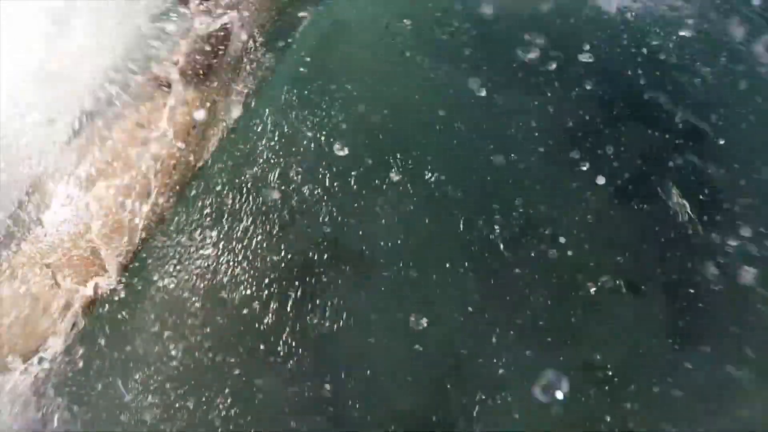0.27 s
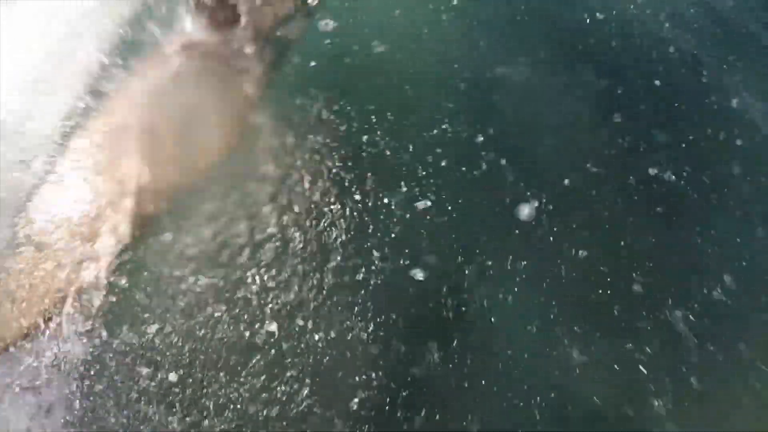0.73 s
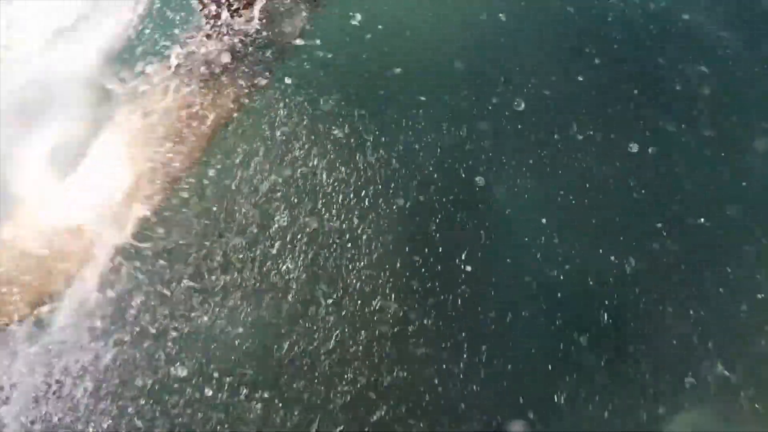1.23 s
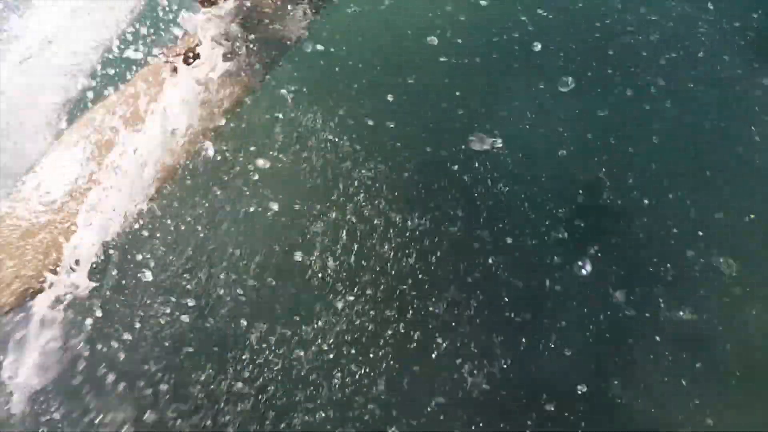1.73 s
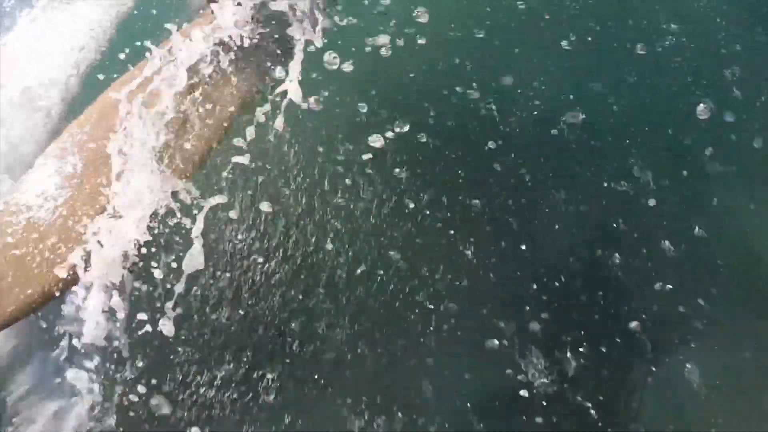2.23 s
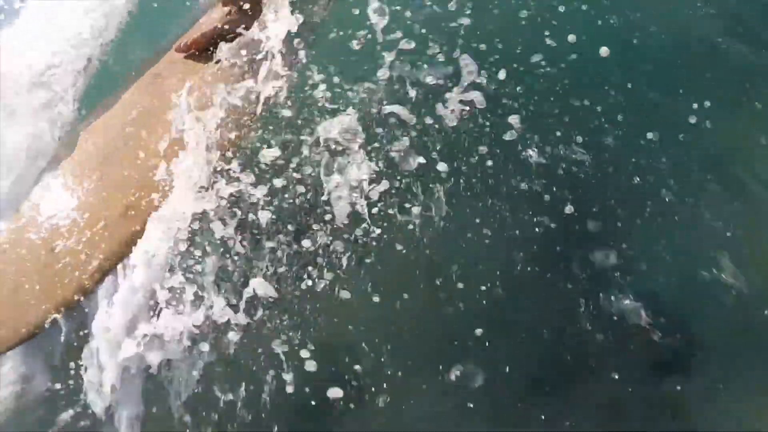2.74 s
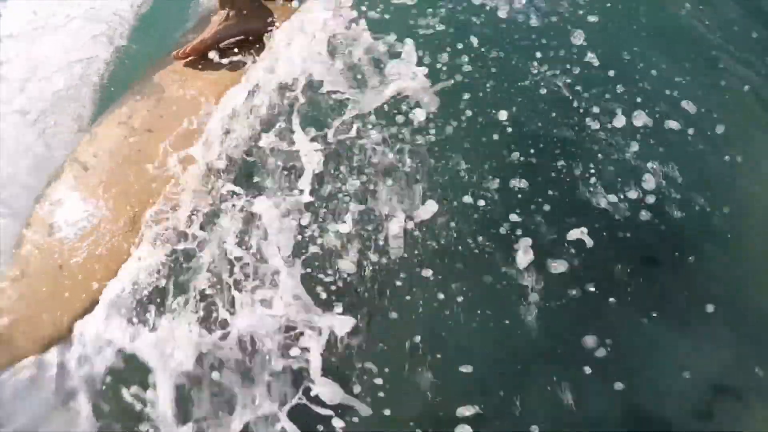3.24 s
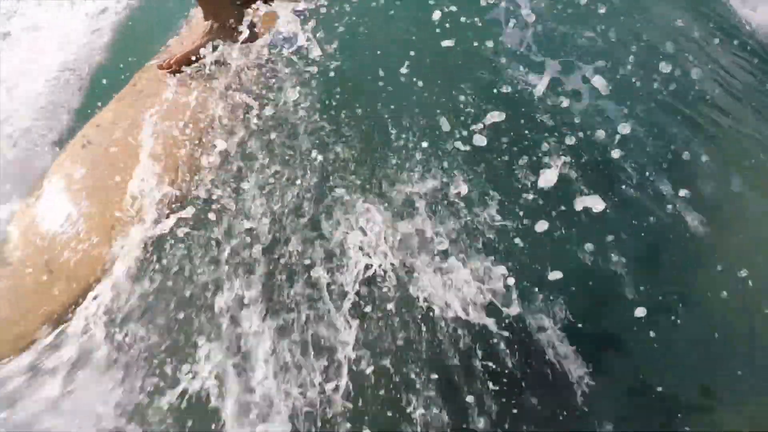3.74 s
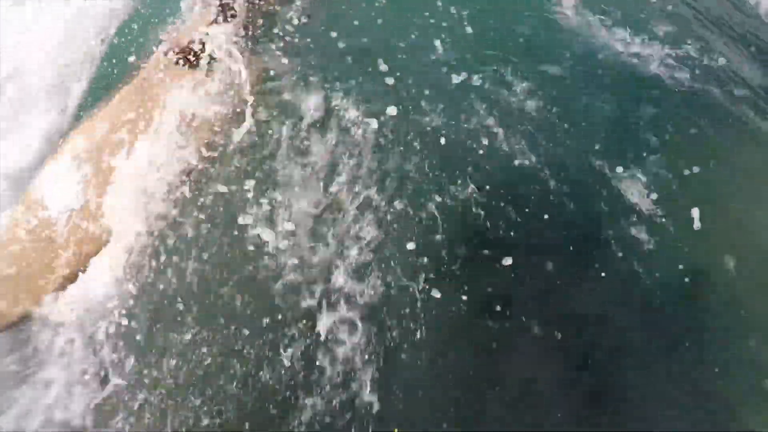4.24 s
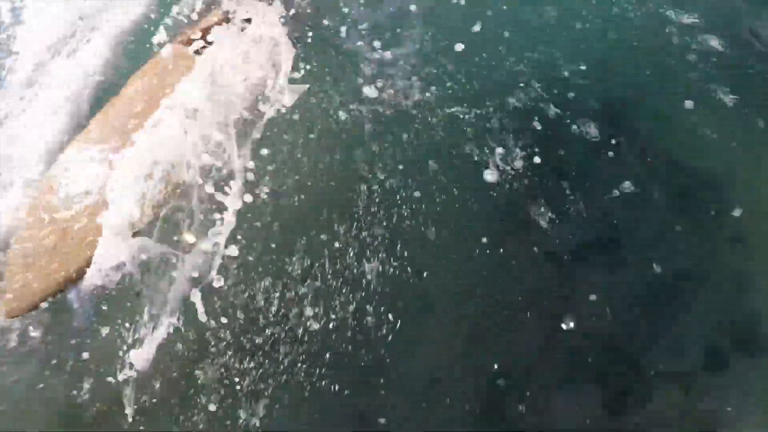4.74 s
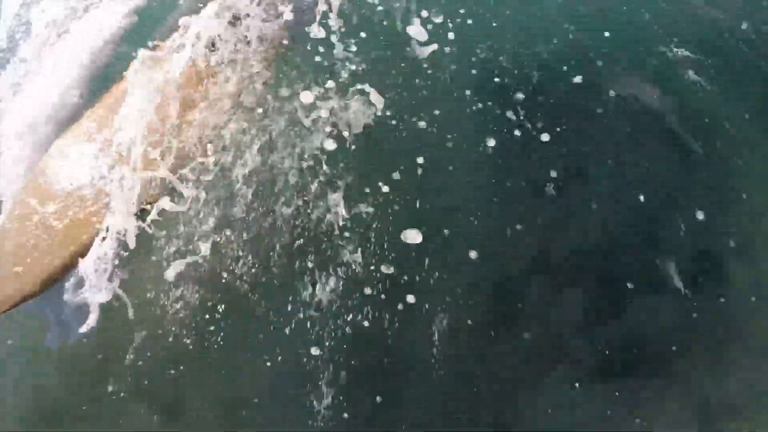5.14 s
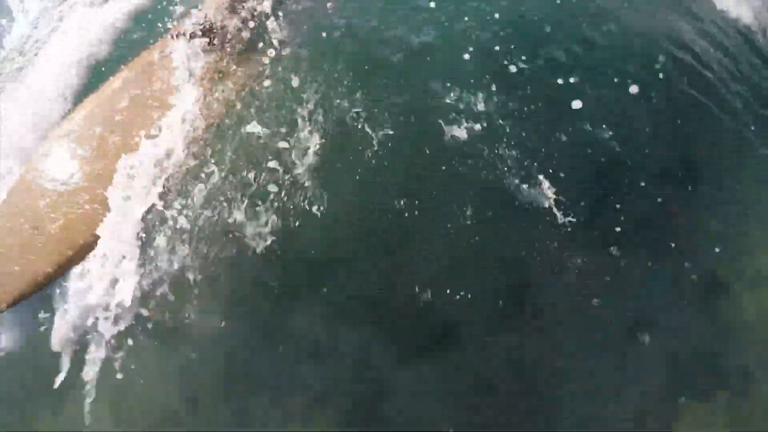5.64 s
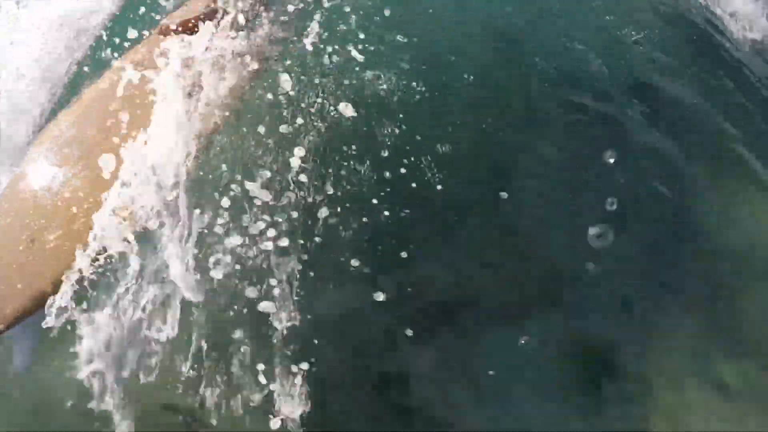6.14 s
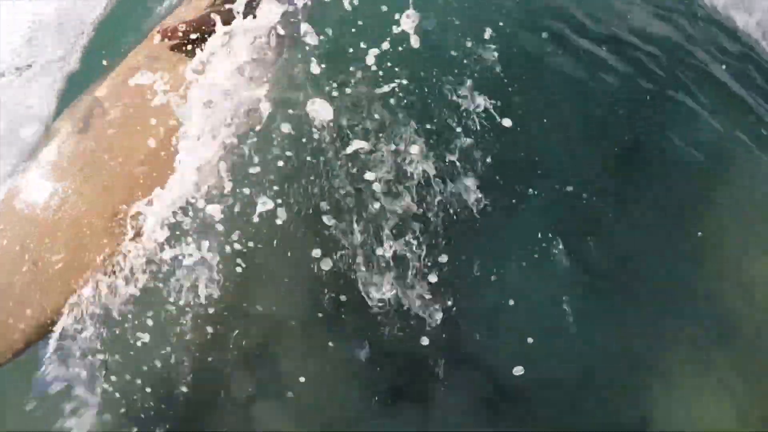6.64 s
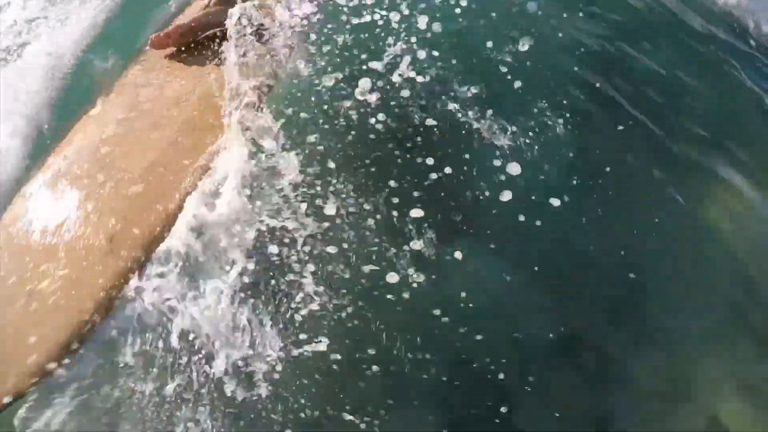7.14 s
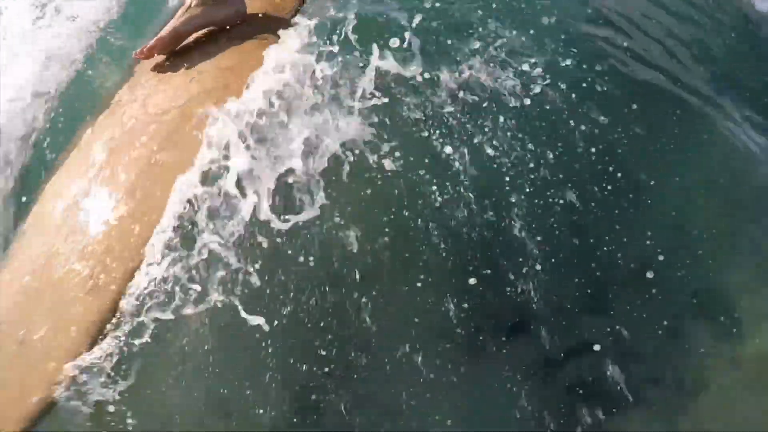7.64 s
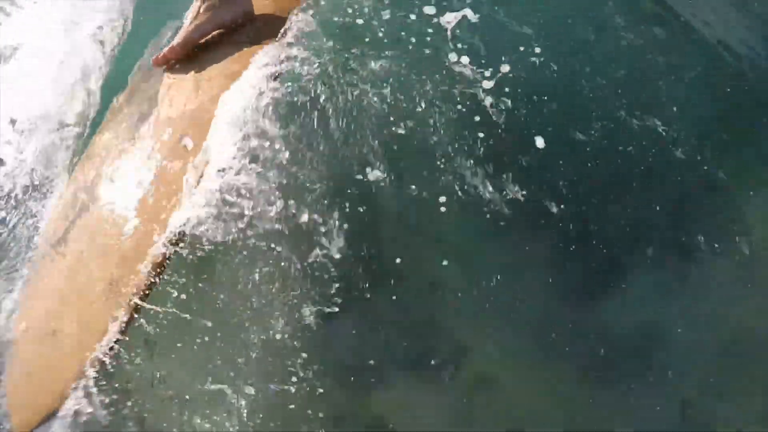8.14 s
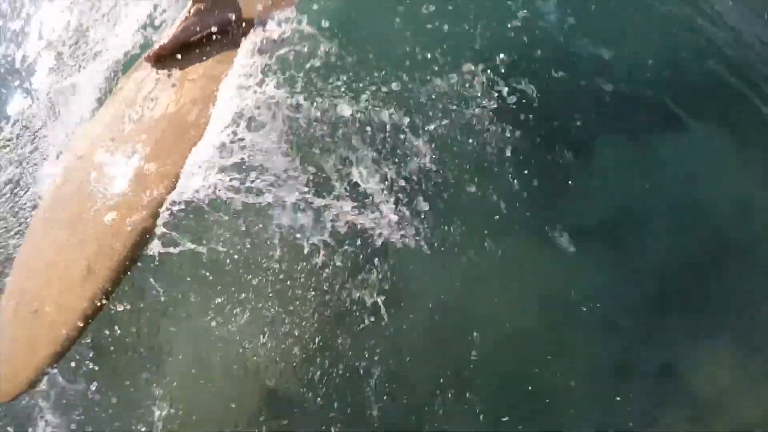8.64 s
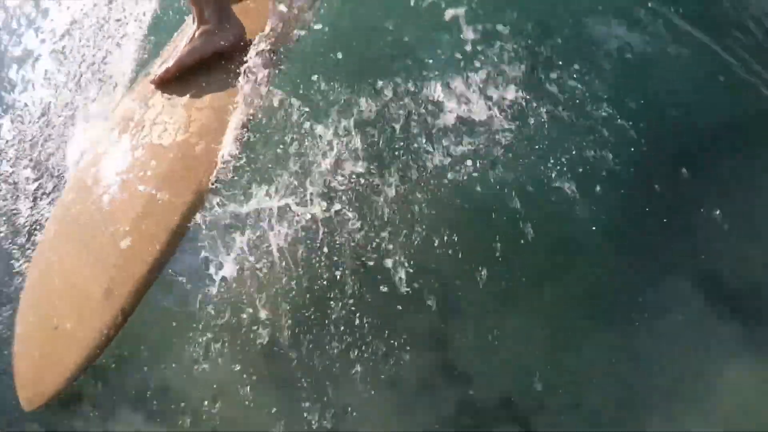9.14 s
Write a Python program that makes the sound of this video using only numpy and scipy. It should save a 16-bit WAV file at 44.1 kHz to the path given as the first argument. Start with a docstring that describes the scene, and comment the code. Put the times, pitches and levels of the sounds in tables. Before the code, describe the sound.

Dull, slowed-down rush of water under a surfboard riding a wave, with fizzing spray, low gulps and wind thumping on the microphone.

```python
"""Surfboard in slow motion

A surfboard runs along a wave, heard from a waterproof camera case close above the water.
The rail throws a rush of bubbles and spray; water churns under the board and surges over bumps,
growing louder and brighter as the board gathers speed. Air pockets gulp below, wind rumbles and
buffets the case, and a few drops tick on it. The case muffles the rush and the droplets."""
import sys
import numpy as np
from scipy import signal
from scipy.fft import rfft, irfft, next_fast_len
from scipy.io import wavfile
from scipy.ndimage import uniform_filter1d

SR = 44100
rng = np.random.default_rng(int(sys.argv[2]) if len(sys.argv) > 2 else 0)


def persist_wave(psi):
    """Save psi, clipped to +-1, as 16-bit WAV."""
    counts = np.round(np.clip(psi, -1, 1) * 32767).astype(np.int16)
    wavfile.write(sys.argv[1], SR, np.atleast_2d(counts).T)


N = 414089
TIME = np.arange(N) / SR

# what the case walls let through, falling in steps above each resonance: freq_hz, gain_db
CASE_RESPONSE = [(300, -0.5), (635, -0.5), (695, -8), (745, -8), (1050, -7.5), (1130, -8.5), (1205, -14.5),
                 (1320, -9.5), (1430, -16), (1800, -9), (1950, -19.5), (2190, -14), (2340, -17.5),
                 (4000, -16.5)]
# thrown sheets of water landing beside the board: centre_s, half_length_s, cloud_db, spray_rise_db
SPLASHES = [(0.697, 0.24, -53, 4), (3.44, 0.25, -41.5, 7), (7.05, .19, -46.5, 0.5)]


def rush(rush_db, gain_db=1.9, flutter_db=0.77):
    """The rail pushes a deep wash aside and peels off a thin sheet that tears into dense bubbles."""
    # tone of the deep wash: freq_hz, gain_db
    wash_colour = [(100, -16), (280, 0), (450, -0.5), (630, -2.5), (800, -8.5), (1200, -18.5), (2000, -31),
                   (3200, -51)]
    # tone of the thin sheet, which sounds higher: freq_hz, gain_db
    sheet_colour = [(150, -23.5), (330, -4.5), (500, -1), (630, 0.5), (1000, 0.5), (1300, -6),
                    (2000, -23.5), (3200, -49.5)]
    # balance of the sheet against the wash: time_s, balance_db
    sheet_balance = [(0, -2), (1.8, -2.5), (2.4, 4.5), (3.4, 4), (3.9, 0.5), (6.1, -2.5), (7.1, -1.5),
                     (8.2, -4), (9.39, -3.5)]
    sheet_db, = curves(sheet_balance)
    foam = bubbles(low_hz=423, high_hz=1200, cycles=20, spread_db=2.5, count=3000)
    sheet = unit(colour(rng.standard_normal(N) + undb(-17.5) * foam, sheet_colour))
    wash = unit(colour(rng.standard_normal(N), wash_colour))
    flow = (wash + undb(sheet_db) * sheet) * undb(flutter_db * walk(rate_hz=70))
    return even(colour(flow, CASE_RESPONSE), span_s=0.25) * undb(rush_db + gain_db)


def churn(rush_db, lumpy_db=1.4):
    """Lumpy turbulence and large bubbles drum under the board, harder over each bump."""
    # low body of the churn: freq_hz, gain_db
    churn_colour = [(50, -16.5), (90, 0.5), (150, -2), (215, -1.5), (250, -4), (300, -13), (500, -37)]
    # how the churn follows the ride: base_db, db_per_speed_doubling, db_per_rush_db
    churn_law = (-30, 7.2, 0.25)
    # bumps in the wave that make the water surge: centre_s, half_length_s, rise_db
    surges = [(2.1, 0.6, 4), (3.0, 0.23, 5), (6.1, 0.51, 3.5), (7.81, 0.12, 7.5), (8.138, .09, 6.5)]
    surge_db = sum(rise_db * swell(s, half_s) for s, half_s, rise_db in surges)
    level_db = follow_ride(churn_law, rush_db) + surge_db
    pockets = bubbles(low_hz=88, high_hz=270, cycles=11, spread_db=2.5, count=500)
    turbulence = rng.standard_normal(N) * undb(lumpy_db * walk(rate_hz=18))
    flow = turbulence + undb(-22) * pockets
    return even(colour(flow, churn_colour), span_s=0.15) * undb(level_db)


def spray(rush_db, patter_db=0.68, mist_share=0.5):
    """Thrown droplets fall back in flurries and fizz on the water; the finest of them hiss above."""
    # tone of the falling droplets: freq_hz, gain_db
    droplet_colour = [(500, -20.5), (900, -6), (1300, 2.5), (1800, -1.5), (2300, -5), (2700, -18),
                      (3400, -41)]
    # hiss of the fine mist: freq_hz, gain_db
    mist_colour = [(1000, -17), (2000, -7), (2450, 0.5), (2750, -5), (3000, -9), (3500, -17.5),
                   (4000, -39.5)]
    # how droplets and mist follow the ride: base_db, db_per_speed_doubling, db_per_rush_db
    droplet_law = (-49, 5, .55)
    mist_law = (-62, 13, 0.36)
    thrown_db = sum(rise_db * swell(s, half_s) for s, half_s, _, rise_db in SPLASHES)
    droplets_db = follow_ride(droplet_law, rush_db) + thrown_db
    mist_db = follow_ride(mist_law, rush_db) + mist_share * thrown_db
    fizz = bubbles(low_hz=960, high_hz=2440, cycles=9.6, spread_db=3.0, count=5000)
    patter = colour(rng.standard_normal(N) + undb(-13.5) * fizz, droplet_colour)
    droplets = unit(colour(patter, CASE_RESPONSE))
    mist = unit(colour(rng.standard_normal(N), mist_colour))
    flurries = undb(patter_db * walk(rate_hz=45))
    return flurries * (droplets * undb(droplets_db) + mist * undb(mist_db))


def splash():
    """Each landing sheet drives a cloud of like-sized bubbles under, which swells and clears."""
    # narrow band of the bubble cloud: freq_hz, gain_db
    cloud_colour = [(600, -19), (850, -2.5), (1000, 2), (1130, -8), (1400, -22)]
    cloud = unit(colour(rng.standard_normal(N), cloud_colour))
    return cloud * sum(undb(cloud_db) * swell(s, half_s) for s, half_s, cloud_db, _ in SPLASHES)


def gulps(attack_s=0.0068, gain_db=1.5):
    """A trapped pocket of air swells into a low note that rises as it nears the surface."""
    # air pockets closing under the board: start_s, pitch_hz, relative_db, t60_s
    pockets = [(2.128, 168, -16, .07), (4.589, 186.5, -13, 0.076), (7.759, 215, -9, 0.2),
               (7.892, 188, -12, 0.067), (8.084, 227, -19, 0.098), (8.92, 206, -14.5, 0.13)]
    out = np.zeros(N)
    for start_s, pitch_hz, relative_db, t60_s in pockets:
        note = ring(pitch_hz, t60_s, glide=0.45)
        attack = 1 - np.exp(-np.arange(len(note)) / SR / attack_s)
        add(out, start_s, undb(relative_db + gain_db) * note * attack)
    return out


def wind(rumble_gain_db=1.23):
    """Small eddies rumble on the case all the time; big ones come as single buffets."""
    # wind strength, gusty at first and then steady: time_s, relative_db
    gusts = [(0, -26), (0.6, -21), (0.9, -29.5), (1.2, -29.5), (1.55, -21.5), (2.25, -31), (3.2, -21.5),
             (3.5, -24.5), (4.4, -26), (5.2, -22.5), (7.15, -21.5), (7.4, -24), (9.39, -23.5)]
    # tone of the rumble: freq_hz, gain_db
    rumble_colour = [(4, -3.5), (12, 3), (30, 1), (45, -5), (56, -3), (70, -10), (110, -20.5), (200, -39.5),
                     (500, -68)]
    # big eddies that hit the case: centre_s, pitch_hz, peak_db, half_length_s
    buffets = [(0.126, 26, -10, 0.021), (0.466, 45, -18, 0.062), (1.539, 25, -7, 0.04),
               (3.172, 45, -2.5, 0.014), (3.271, 66, -18, 0.031), (5.019, 46, -7, 0.013),
               (5.942, 44, -9.5, 0.022), (6.342, 42, -8.5, 0.014), (7.057, 28, -14, 0.061),
               (7.682, 80, -13.5, 0.026), (7.827, 88, -13, 0.025), (8.121, 112, -20, 0.031),
               (9.092, 48, -1.5, 0.012), (9.132, 46, -3.5, .016), (9.265, 34, -10.5, 0.011)]
    gust_db, = curves(gusts)
    rumble = even(colour(rng.standard_normal(N), rumble_colour), span_s=0.22)
    out = rumble * undb(gust_db + rumble_gain_db)
    for centre_s, pitch_hz, peak_db, half_s in buffets:
        t = np.arange(-3 * half_s, 3 * half_s, 1 / SR)
        thump = np.cos(2 * np.pi * pitch_hz * t) * np.exp(-(t / half_s) ** 2)
        add(out, centre_s + t[0], undb(peak_db) * thump)
    return out


def drops(t60_s=0.013, overtone_ratio=1.5, overtone_db=-11, attack_s=0.00044, gain_db=4):
    """Each drop knocks two short rings out of the case; its soft contact rounds the attack."""
    # drops striking the case: start_s, pitch_hz, relative_db
    hits = [(0.228, 750, -26), (0.645, 900, -27), (3.503, 980, -24.5), (3.677, 640, -20),
            (5.701, 1210, -22.5), (6.554, 1120, -27), (7.112, 966, -30), (7.510, 1330, -28),
            (7.558, 1260, -33), (7.751, 682, -25)]
    out = np.zeros(N)
    for start_s, pitch_hz, relative_db in hits:
        overtone = undb(overtone_db) * ring(pitch_hz * overtone_ratio, t60_s, glide=0.05)
        knock = ring(pitch_hz, t60_s, glide=0.05) + overtone
        attack = (1 - np.exp(-np.arange(len(knock)) / SR / attack_s)) ** 2
        add(out, start_s, undb(relative_db + gain_db) * knock * attack)
    return out


def follow_ride(law, rush_db, usual_rush_db=-34):
    """Level in dB of a water sound that grows with the board's speed and the bite of the rail."""
    # the board gathers speed: time_s, share_of_full_speed
    board_speed = [(0, 0.45), (1.9, 0.47), (3.3, .74), (4.6, 0.78), (5.4, 0.89), (6.6, 0.99), (9.39, 0.98)]
    speed, = curves(board_speed)
    base_db, db_per_speed_doubling, db_per_rush_db = law
    return base_db + db_per_speed_doubling * np.log2(speed) + db_per_rush_db * (rush_db - usual_rush_db)


def bubbles(low_hz, high_hz, cycles, spread_db, count):
    """A swarm of bubbles of many sizes, each ringing briefly and rising in pitch."""
    out = np.zeros(N)
    for when, pitch, strength in rng.random((count, 3)):
        hz = low_hz + (high_hz - low_hz) * pitch
        rarity = -np.log(1 - 0.99 * strength)  # many quiet bubbles, a few loud ones
        gain = undb(spread_db * rarity) * np.sqrt(hz)
        add(out, when * N / SR, gain * ring(hz, cycles / hz, glide=0.22))
    return unit(out)


def ring(hz, t60_s, glide):
    """A dying sine whose pitch rises by the share glide as it fades by 60 dB."""
    t = np.arange(int(t60_s * SR) + 2) / SR
    return np.sin(2 * np.pi * hz * t * (1 + glide * t / t60_s / 2)) * np.exp(-np.log(1000) * t / t60_s)


def colour(x, points):
    """Causal EQ through (freq_hz, gain_db) points, falling 20 dB an octave above the last."""
    size = next_fast_len(N + SR // 2, real=True)
    size += size % 2
    hz, db = np.transpose(points)
    octave = np.log2(np.maximum(np.arange(size // 2 + 1) * SR / size, 1))
    gain_db = np.interp(octave, np.log2(hz), db) - 20 * np.maximum(octave - np.log2(hz[-1]), 0)
    # folding the cepstrum gives minimum phase: nothing rings ahead of an attack
    cepstrum = irfft(np.log(undb(gain_db)), size)
    cepstrum[1:size // 2] *= 2
    cepstrum[size // 2 + 1:] = 0
    return irfft(rfft(x, size) * np.exp(rfft(cepstrum)), size)[:N]


def walk(rate_hz):
    """A wobble of rms 1 that slides to a new random value rate_hz times a second."""
    hold = int(SR / rate_hz)
    steps = np.repeat(rng.standard_normal(N // hold + 1), hold)
    return unit(uniform_filter1d(steps, hold)[:N])


def even(x, span_s):
    """Hold turbulence steady: rms near 1 over every stretch of span_s."""
    width = int(span_s * SR)
    power = uniform_filter1d(uniform_filter1d(x ** 2, width), width)
    return x / np.sqrt(power + 1e-12)


def swell(centre_s, half_s):
    """A smooth rise and fall around centre_s."""
    return np.exp(-((TIME - centre_s) / half_s) ** 2)


def curves(table):
    """The columns of a breakpoint table as envelopes, sample by sample."""
    time_s, *columns = np.transpose(table)
    return [np.interp(TIME, time_s, column) for column in columns]


def add(out, start_s, sound):
    """Mix a sound in at start_s."""
    start = int(np.clip(start_s * SR, 0, N))
    out[start:start + len(sound)] += sound[:N - start]


def undb(db):
    """Decibels to gain."""
    return 10 ** (np.asarray(db) / 20)


def unit(x):
    """Scale to rms 1."""
    return x / np.sqrt(np.mean(x ** 2))


def scene():
    """Wind and water at the one microphone."""
    # water pushed aside as the rail bites and lets go: time_s, relative_db
    rail_bite = [(0.02, -38), (0.67, -40), (2.57, -37.5), (2.6, -38.5), (3.95, -33.5), (4.76, -36),
                 (5.36, -33.5), (6.03, -35.5), (6.53, -33.5), (7.08, -34), (7.1, -31), (7.28, -34.5),
                 (7.91, -32.5), (7.93, -35), (8.82, -34), (8.9, -34.5), (8.95, -31), (9.37, -35)]
    rush_db, = curves(rail_bite)
    return (wind() + churn(rush_db) + rush(rush_db) + spray(rush_db) + splash() + drops() + gulps())[None]


def record(dry, dull_hz=3500, slow_rate_hz=12000, top_hz=15000):
    """Slow motion spreads the samples out and joins them by straight lines, leaving a faint sizzle."""
    dull = signal.sosfilt(signal.butter(12, dull_hz, fs=SR, output="sos"), dry[0])
    sparse = signal.resample_poly(dull, slow_rate_hz, SR, window=("kaiser", 10))
    sparse_time = np.arange(len(sparse)) / slow_rate_hz
    oversampled = np.interp(np.arange(4 * N) / (4 * SR), sparse_time, sparse)
    joined = signal.resample_poly(oversampled, 1, 4)
    high_cut = signal.ellip(8, 0.2, 70, top_hz, fs=SR, output="sos")
    return signal.sosfilt(high_cut, joined)[None]


dry = scene()
out = record(dry)
persist_wave(out)
```